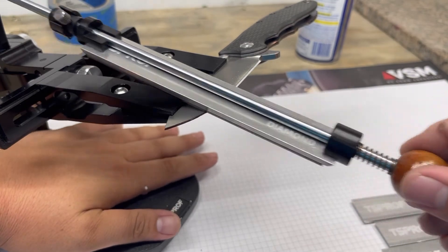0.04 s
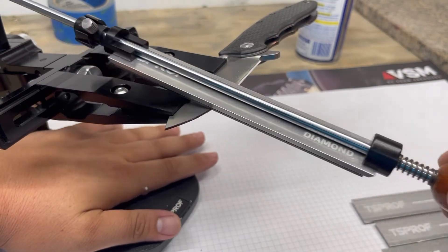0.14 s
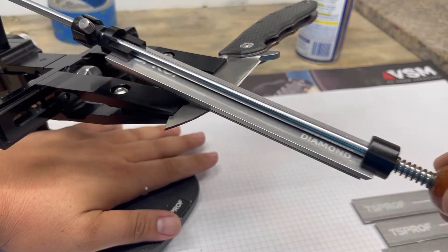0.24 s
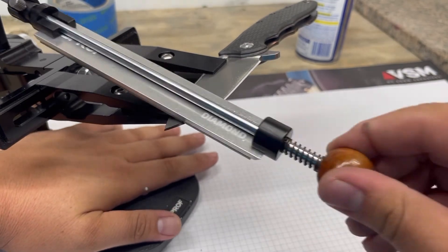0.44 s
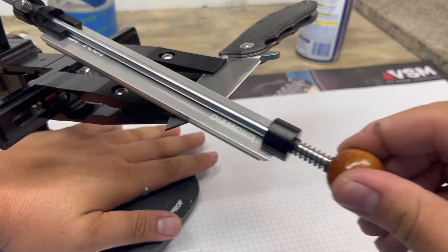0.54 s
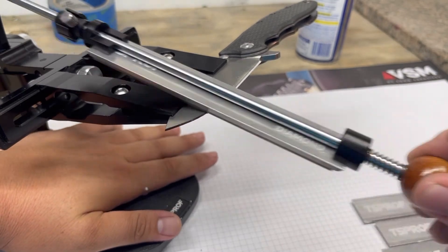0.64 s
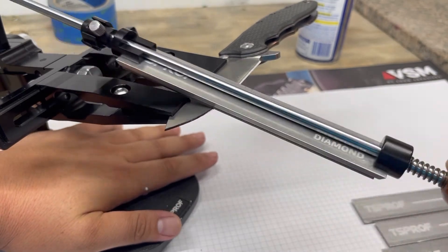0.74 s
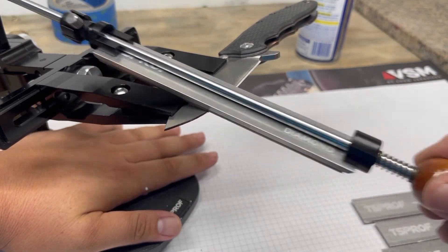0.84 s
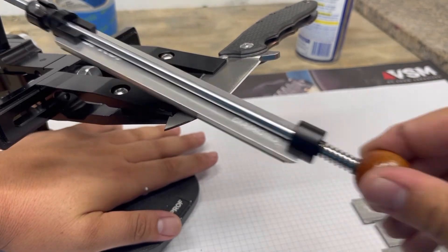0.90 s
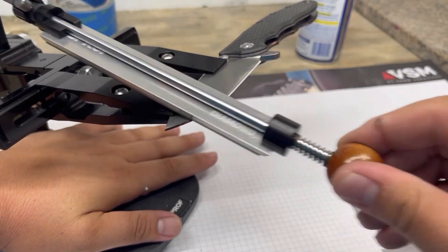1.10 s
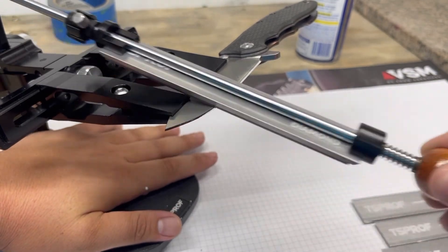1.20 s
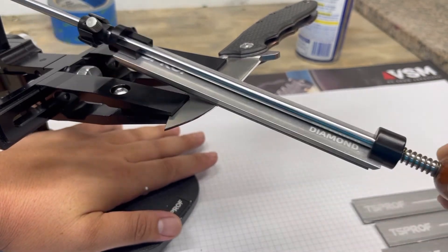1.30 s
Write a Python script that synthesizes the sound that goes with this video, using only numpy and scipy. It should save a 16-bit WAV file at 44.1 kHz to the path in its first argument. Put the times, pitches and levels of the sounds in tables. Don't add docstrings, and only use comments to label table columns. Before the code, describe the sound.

A gritty diamond stone scrapes to and fro along a clamped steel knife blade, bright and slightly ringing, with tiny gaps at each turn; low wind thumps buffet the close stereo microphone early on, in a small, quiet workshop.

```python
import sys
import numpy as np
from scipy import signal
from scipy.fft import rfft, irfft
from scipy.io import wavfile
from scipy.ndimage import uniform_filter1d, minimum_filter1d

SR = 44100
rng = np.random.default_rng(int(sys.argv[2]) if len(sys.argv) > 2 else 0)


def voltage_ratio(decibels):
    exponent = np.asarray(decibels, float) / 20
    return 10 ** exponent


def bounce(signal):
    frames = np.transpose(np.atleast_2d(signal))
    limited = np.clip(frames, -1, 1)
    pcm = np.round(limited * 32767).astype(np.int16)
    wavfile.write(sys.argv[1], SR, pcm)


N = 59535

# t/s, slowing/s, restart/s, level/dB at rest
TURNING_POINTS = [
    (-.1, 0.028, .02, -20),
    (.16, 0.028, 0.018, -15),
    (.447, 0.034, 0.012, -22.5),
    (.71, 0.029, 0.015, -16.5),
    (.988, 0.038, 0.021, -18.5),
    (1.243, 0.028, 0.033, -14),
    (1.5, .02, .02, -20),
]


def unit_rms(x):
    return x / np.sqrt(np.mean(x ** 2) + 1e-20)


def column(table, at, index=1):
    rows = np.array(table, float)
    return np.interp(at, rows[:, 0], rows[:, index])


def coloured(x, spectrum):
    f, db = np.transpose(spectrum)
    hz = np.fft.rfftfreq(N, 1 / SR)
    gain = voltage_ratio(np.interp(np.log(hz + 1), np.log(f), db))
    return unit_rms(irfft(rfft(x) * gain, N))


def wander(seconds):
    size = max(int(seconds * SR), 2)
    smooth = uniform_filter1d(rng.standard_normal(N), size)
    return unit_rms(uniform_filter1d(smooth, size))


def resonance(x, hz, width):
    r = np.exp(-np.pi * width / SR)
    return signal.lfilter([1 - r, 0, r - 1], [1, -2 * r * np.cos(2 * np.pi * hz / SR), r * r], x)


def narrow_dips(hz, table):
    return voltage_ratio(sum(db * np.exp(-((hz - f) / w) ** 2) for f, w, db in table))


def contact_place(t):
    return np.interp(t, np.array(TURNING_POINTS)[:, 0], np.arange(len(TURNING_POINTS)) % 2)


def grit():
    per_second, spread_db, clump_db, clump_s = 9000, 1, 1.5, 0.0023
    hit = (rng.random(N) < per_second / SR) * rng.choice([-1., 1.], N)
    size_db = spread_db * np.minimum(rng.exponential(1, N), 5)
    return unit_rms(hit * voltage_ratio(size_db + clump_db * wander(clump_s)))


def hand_effort_db(t, effort):
    # t/s, level/dB over the scrape
    catches = [
        (.909, 6),
        (0.49, 2),
        (0.785, 2),
        (.555, 1),
        (1.009, 3),
        (.183, 3),
    ]
    squareness = 2.24
    rise_s, fall_s = .0007, .004
    effort_db = column(effort, t)
    for s, slowing, restart, db in TURNING_POINTS:
        effort_db += db * np.exp(-abs((t - s) / np.where(t < s, slowing, restart)) ** squareness)
    for s, db in catches:
        effort_db += db * np.exp(-abs(t - s) / np.where(t < s, rise_s, fall_s))
    return effort_db


def struck_modes(modes, drive, place):
    node_swing, node_db = 1.1, -13
    wander_db, wander_s = 1.5, .06
    total = 0
    for hz, width, db, node in modes:
        coupling_db = node_db * np.cos(np.pi * (node_swing * place - node)) ** 2
        force = drive * voltage_ratio(coupling_db + wander_db * wander(wander_s))
        total = total + voltage_ratio(db) * resonance(force, hz, width)
    return total


def singing_modes(drive):
    sings = [(0, 0.19, 970, 150, -12.5), (0, 0.025, 4100, 270, -2), (.18, 0.079, 3900, 200, -15),
             (0.12, 0.39, 1630, 59, -13), (0.593, 0.097, 2400, 80, -7.5), (.54, 0.11, 6020, 61, -4),
             (0.796, 0.038, 5980, 60, -1.5), (.74, .13, 1640, 60, -11), (.89, .07, 1640, 60, -16),
             (.89, 0.053, 2770, 44, -11), (.89, 0.059, 2250, 50, -21), (1.0, 0.074, 2750, 24, -11),
             (0.993, 0.077, 2200, 36, -20), (1.13, 0.097, 2650, 140, -7), (1.113, 0.11, 6700, 90, -3.5),
             (1.0, 0.26, 5670, 850, -8.5), (1.12, 0.12, 3700, 70, -15), (1.26, 0.068, 3950, 160, -14),
             (1.26, .09, 1580, 37, -12), (0.26, 0.1, 12000, 100, -11), (0.012, 0.13, 7900, 87, -2.5),
             (1.04, .1, 9100, 120, -5.5)]
    t = np.arange(N) / SR
    total = 0
    for s, length, hz, width, db in sings:
        belly = np.sin(np.pi * np.clip((t - s) / length, 0, 1)) ** .5
        total = total + voltage_ratio(db) * resonance(drive * belly, hz, width) / np.std(resonance(drive, hz, width))
    return total


def friction_noise(drive, place):
    # f/Hz, level/dB
    scrape_colour = [(4600, -24), (5900, -8), (7000, -7.5), (8000, -5), (9500, -5.5), (11200, -0.5),
                     (12000, -19), (16000, -28)]
    tilt_hz, tilt_db = 7100, 9
    broad = coloured(drive, scrape_colour)
    dull = signal.sosfiltfilt(signal.butter(3, tilt_hz, fs=SR, output='sos'), broad)
    return dull * voltage_ratio(tilt_db * (place - 2.0)) + (broad - dull) * voltage_ratio(tilt_db * (.5 - place))


def rasp():
    # t/s, level/dB, coarse bite level/dB
    effort = [(0, -32.5, 3.5), (.104, -41, 5.5), (.2, -38, 1), (.318, -30.5, -5.5), (.36, -33, 1.5),
              (.41, -28, 3), (.47, -33.5, 3), (.552, -29.5, -7.5), (.64, -34.5, -0.5), (.735, -40.5, 2.5),
              (.79, -34, 2), (.86, -29, -6.5), (.9, -27.5, 1), (.95, -25.5, 5), (1.02, -29, -1.5),
              (1.056, -26, -8.5), (1.2, -37, 1.5), (1.35, -30.5, -3)]
    # f/Hz, width/Hz, level/dB, node place 0-1
    blade = [(7430, 160, 0.5, 0.21), (7840, 84, -2, 0.067), (8050, 170, -2.5, 0.81), (8350, 95, -4.5, 0.87),
             (8480, 45, -2.5, 1), (9000, 130, -3.5, 0.64), (9320, 160, -3, 1), (9940, 81, -2.5, .3),
             (10330, 84, -8, 0.7), (10430, 113, 4, 0.7), (10930, 38, 9, 0.28), (11000, 43, -8, 1),
             (11280, 48, 4, 0.73), (11700, 92, -2.5, 0.72)]
    # f/Hz, width/Hz, level/dB, node place 0-1
    bar = [(5200, 82, -17, 0.44), (2290, 20, -21, 0.5), (2483, 14, -1, 0.17), (2724, 81, -5.5, 0.85),
           (3280, 160, -12.5, 0.91), (3625, 124, -5.5, 0.24), (3980, 235, -8, 0.19), (4830, 60, -12, 0),
           (4380, 44, -31, 0.8), (5690, 190, -6.5, 0.33), (5960, 51, 7, 0.13), (6860, 390, -5, 0.15)]
    # f/Hz, level/dB
    bite_colour = [(850, -22), (1200, -27), (1700, -13), (2500, -13), (3000, -16.5), (3800, -13.5),
                   (4800, -16.5), (9000, -25)]
    shared_grit = 0.58
    modes_db, scrape_db, bite_db = -3.5, -2.5, -10.5
    t = np.arange(N) / SR
    effort_db = hand_effort_db(t, effort)
    place, fine = contact_place(t), grit()
    drive = fine * voltage_ratio(effort_db)
    mixed_grit = unit_rms(shared_grit * fine + (1 - shared_grit) * grit())
    coarse = mixed_grit * voltage_ratio(effort_db + column(effort, t, index=2))
    scrape = friction_noise(drive, place)
    rings = unit_rms(struck_modes(blade, drive, place) + struck_modes(bar, coarse, place))
    rings += singing_modes(drive)
    bite = coloured(coarse, bite_colour)
    drive_rms = np.sqrt(np.mean(drive ** 2))
    return drive_rms * (voltage_ratio(modes_db) * rings + voltage_ratio(scrape_db) * scrape + voltage_ratio(bite_db) * bite)


def scatter(x):
    place, out = contact_place(np.arange(N) / SR), 0
    for k in range(4):
        path = rng.standard_normal((2, 300)) * voltage_ratio(-np.arange(300) * 0.014)
        near = np.cos(np.pi / 2 * np.clip(3 * place - k, -1, 1))
        out = out + signal.fftconvolve((x * near)[None], path / np.linalg.norm(path[0]), axes=1)[:, :N]
    return out


def room(x):
    t60_s = .09
    t = np.arange(SR // 4) / SR
    tail = rng.standard_normal((2, len(t))) * voltage_ratio(-60 * t / t60_s) * (t > .004)
    return signal.fftconvolve(x[None], tail / np.linalg.norm(tail[0]), axes=1)[:, :N]


def gust():
    # t/s, level/dB, quick eddy level/dB
    strength = [(0, -50, 3), (.21, -47, -18), (.235, -16.5, 6), (.27, -19, 1), (.31, -11.5, -5),
                (.34, -20, -2.5), (.376, -12, -5), (.43, -15.5, 5), (.49, -10.5, 3.5), (.56, -15.5, 3),
                (.65, -16.5, 1.5), (.69, -33.5, 12), (.75, -32.5, -1), (.82, -41, 2), (.9, -34, 1),
                (.96, -31.5, -5.5), (1.03, -39.5, -8.5), (1.35, -55.5, -16)]
    # f/Hz, level/dB
    slow_colour = [(15, -47), (32, -34), (50, -6.5), (85, -2), (130, -2.5), (220, -9), (400, -19),
                   (800, -60)]
    # f/Hz, level/dB
    quick_colour = [(80, -26), (200, -8.5), (320, -5), (550, -9), (750, -19), (1000, -30), (1400, -38),
                    (2500, -62)]
    # t/s, half length/s, level/dB
    surges = [(.248, .007, -19), (.268, .01, 6), (.286, .004, -7), (.303, .008, 2.5), (.322, .007, -14),
              (.341, .004, -5), (.36, .008, 10.5), (.381, .005, -0.5), (.413, .004, -4), (.435, .008, -0.5),
              (.474, .005, -2), (.495, .008, 6.5), (.528, .004, -3.5), (.545, .01, -3.5), (.585, .01, 2),
              (.61, .004, -6), (.64, .008, -6), (.657, .006, 2.5), (.675, .005, 1), (.688, .005, -16),
              (.707, .007, 3)]
    # t/s, level/dB, f/Hz
    snaps = [(.226, -43, 450), (.237, -17, 513), (0.293, -21, 556), (.304, -17, 600), (.333, -23, 600),
             (.347, -13, 447), (.363, -25, 690), (0.41, -24, 600), (.421, -21, 800), (.437, -14, 500),
             (.493, -10, 720), (.558, -12, 654), (.625, -14.5, 600), (.673, -26, 700), (.697, -22, 600),
             (.848, -35, 450), (.993, -27.5, 533), (1.016, -39, 450), (1.16, -36.5, 330), (0.254, -24, 73),
             (0.477, -3.5, 85), (0.469, -31, 310), (0.643, -13.5, 94), (.356, -11, 393), (.263, -29, 540),
             (.298, -17, 250), (.374, -11, 600), (.421, -8, 367), (0.444, -18, 500), (0.459, 2.5, 430),
             (.482, -4.5, 640), (.498, -2, 460), (0.5202, -2, 666), (.565, -8, 695), (.605, -13, 665),
             (.655, -17.5, 600), (0.7046, -21.5, 520), (0.7076, -21, 520), (.711, -24, 500),
             (0.75, -17.5, 131), (.783, -27, 670), (.88, -25, 450), (.989, -23.5, 162), (.979, -28.5, 630),
             (1.102, -32, 406), (1.222, -38, 86)]
    slow_lump_db, quick_lump_db, lump_s = 1.0, 1.5, .005
    quick_db = -5.5
    t = np.arange(N) / SR
    slow = coloured(rng.standard_normal(N) * voltage_ratio(slow_lump_db * wander(2 * lump_s)), slow_colour)
    quick = coloured(rng.standard_normal(N) * voltage_ratio(quick_lump_db * wander(lump_s)), quick_colour)
    quick *= voltage_ratio(sum(db * np.exp(-((t - s) / d) ** 2) for s, d, db in surges))
    quick *= voltage_ratio(quick_db + column(strength, t, index=2))
    air = voltage_ratio(column(strength, t)) * (slow + quick)
    for s, db, hz in snaps:
        u = np.pi * hz * (t - s)
        air += voltage_ratio(db) * (1 - 2 * u ** 2) * np.exp(-u ** 2)
    return air


def workshop_floor():
    # f/Hz, level/dB
    floor_colour = [(30, -11), (65, 6), (130, -20), (300, -17), (1000, -36), (4000, -34), (8000, -25.5),
                    (16000, -65)]
    return coloured(rng.standard_normal(N), floor_colour) * voltage_ratio(-45.5)


def at_ports(x, table):
    hz = np.fft.rfftfreq(N, 1 / SR)
    phase, pan_db = column(table, hz), column(table, hz, index=2)
    z = rfft(x)
    return np.array([irfft(z * np.exp(.5j * s * phase) * voltage_ratio(.5 * s * pan_db), N) for s in (1, -1)])


def scene():
    # f/Hz, left phase lead/rad, left-right level/dB
    stone_ports = [(1200, 0, -3), (2400, -.5, -1.5), (5000, 0, -4), (5700, -1.4, -2), (6500, -.4, -2),
                   (7300, -1.8, -1.5), (8790, .1, 0), (13200, 8.7, 0)]
    # f/Hz, left phase lead/rad, left-right level/dB
    wind_ports = [(60, 0.96, -0.8), (250, 0.7, 0), (600, 1, 0), (1139, 2.12, -5.5)]
    # f/Hz, width/Hz, level/dB
    bench_dips = [(2960, 80, -16), (4800, 100, -9), (1900, 60, -6)]
    room_db = -22
    hz = np.fft.rfftfreq(N, 1 / SR)
    air = gust() + workshop_floor()
    stone = rasp()
    near = at_ports(stone, stone_ports)
    same = np.interp(hz, [5000, 8500], [0.64, 0.95])
    near = irfft(rfft(near) * np.sqrt(same) + rfft(scatter(stone)) * np.sqrt(1 - same), N)
    z = rfft(near + voltage_ratio(room_db) * room(stone)) * narrow_dips(hz, bench_dips)
    z += rfft(at_ports(air, wind_ports))
    z -= z.mean(0) * (1 - narrow_dips(hz, [(10260, 100, -26)]))
    return irfft(z, N)


def limited(x):
    ceiling = .92
    need = np.minimum(ceiling / (abs(x).max(0) + 1e-9), 1)
    held = minimum_filter1d(need, size=801)
    return x * uniform_filter1d(uniform_filter1d(held, size=400), size=400)


def low_pass(x):
    return signal.sosfilt(signal.butter(12, 17040, fs=SR, output="sos"), x)


def record(dry):
    # t/s at start, length/s
    top_open = [
        (0.02, 0.03),
        (0.078, .05),
        (.185, 0.018),
        (0.457, 0.021),
        (.595, 0.071),
        (.72, 0.041),
        (0.992, .05),
        (1.12, 0.07),
        (1.28, 0.04),
    ]
    mid_edge_hz, side_edge_hz, edge_width_hz = 12900, 12880, 150
    top_low_hz, top_high_hz, top_db = 14560, 15700, 3
    hz, t = np.fft.rfftfreq(N, 1 / SR), np.arange(N) / SR
    z = rfft(limited(dry))
    gate = uniform_filter1d(sum((t > s) * (t < s + d) * 1. for s, d in top_open), size=400)
    top = irfft(z * (hz > top_low_hz) * (hz < top_high_hz), N) * gate * voltage_ratio(top_db)
    mid = (z[0] + z[1]) / 2 * np.clip((mid_edge_hz - hz) / edge_width_hz + .5, 0, 1)
    side = (z[0] - z[1]) / 2 * np.clip((side_edge_hz - hz) / edge_width_hz + .5, 0, 1)
    mix = irfft(np.array([mid + side, mid - side]), N) + top
    return low_pass(mix)


dry = scene()
out = record(dry)
bounce(out)
```